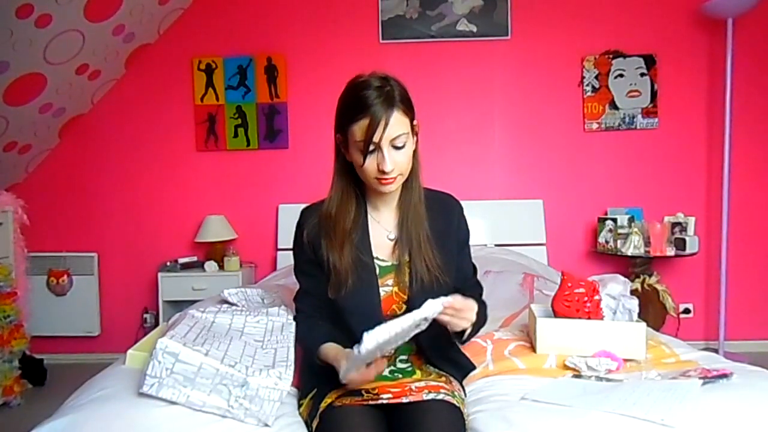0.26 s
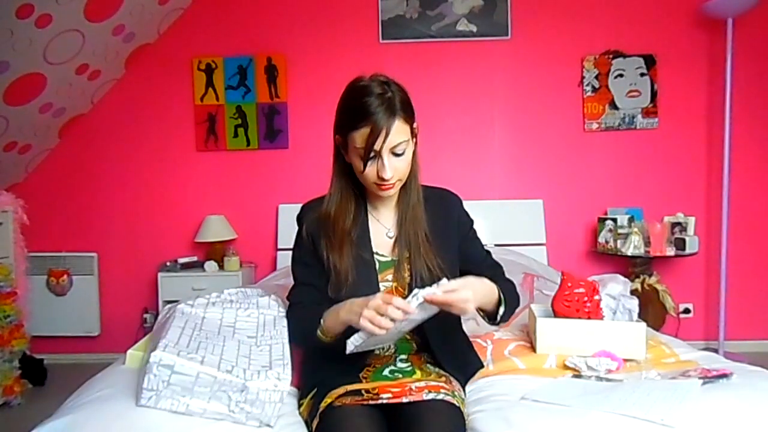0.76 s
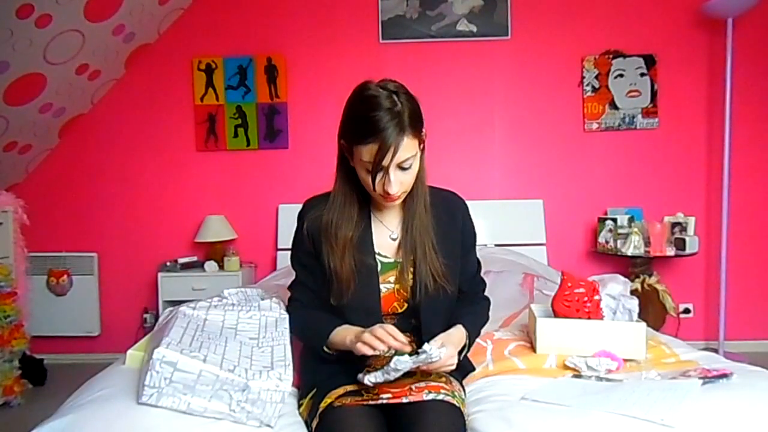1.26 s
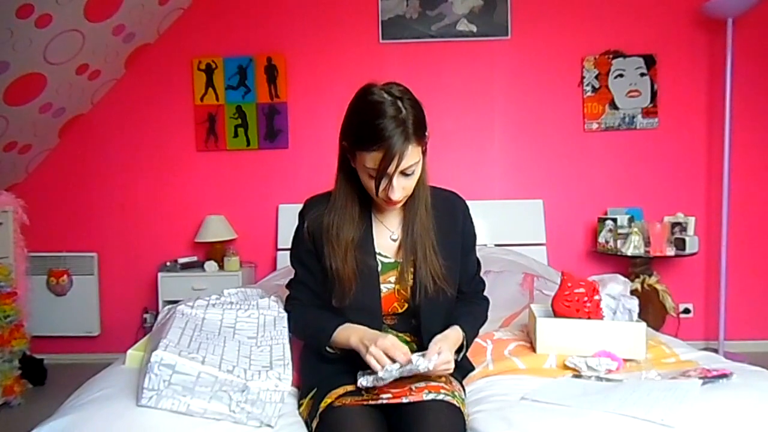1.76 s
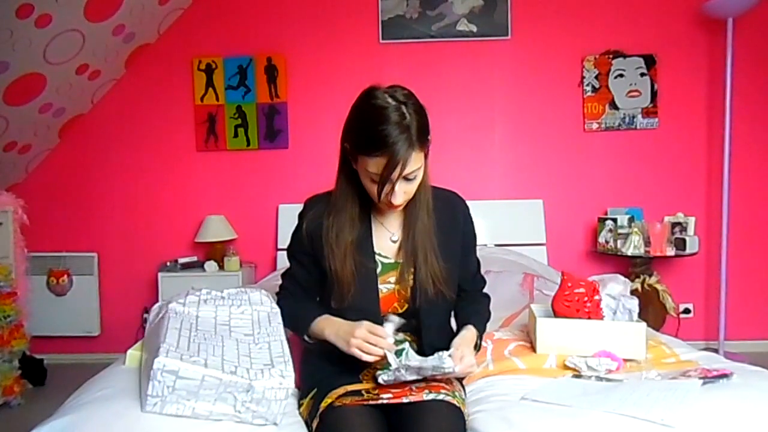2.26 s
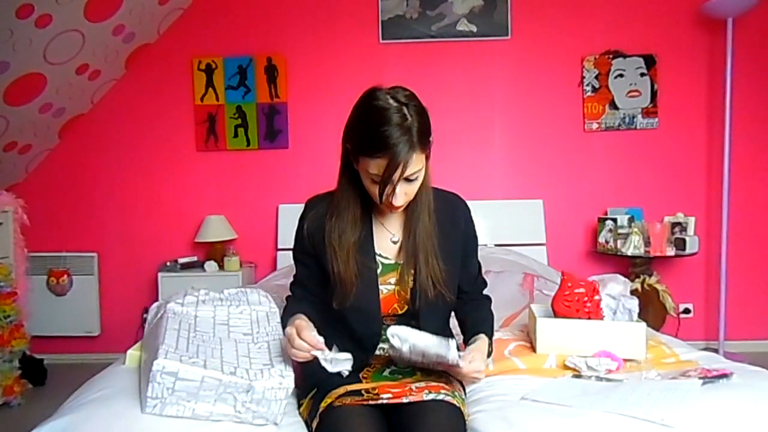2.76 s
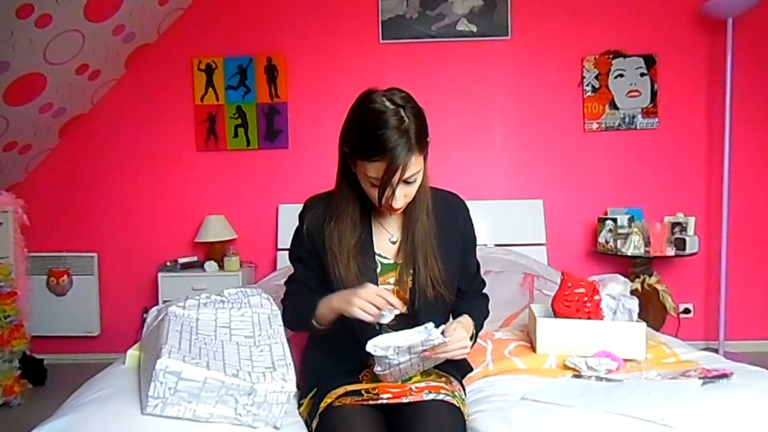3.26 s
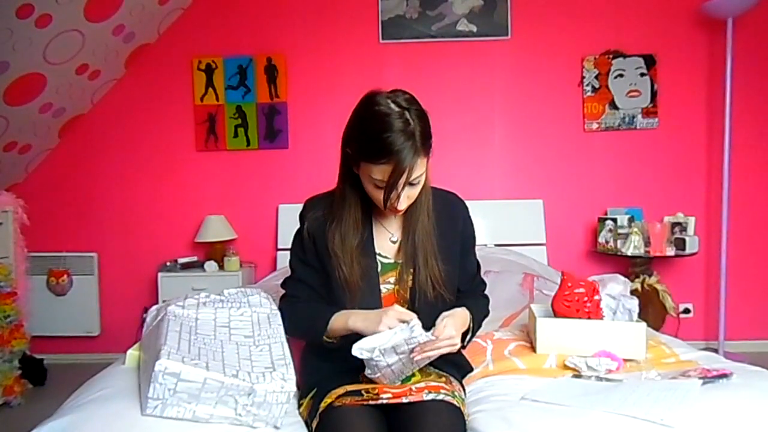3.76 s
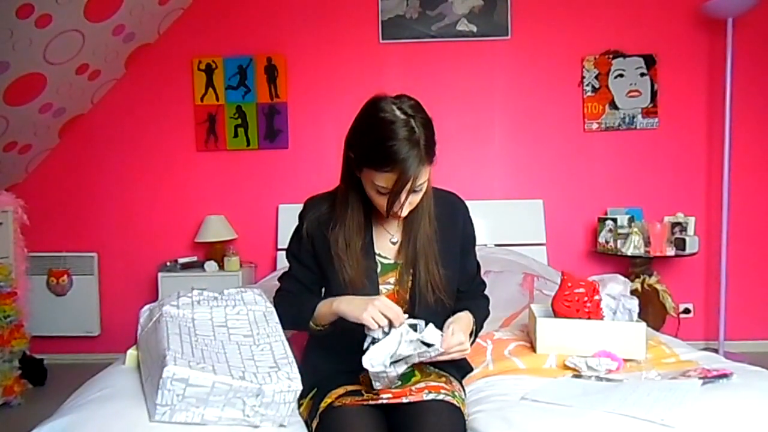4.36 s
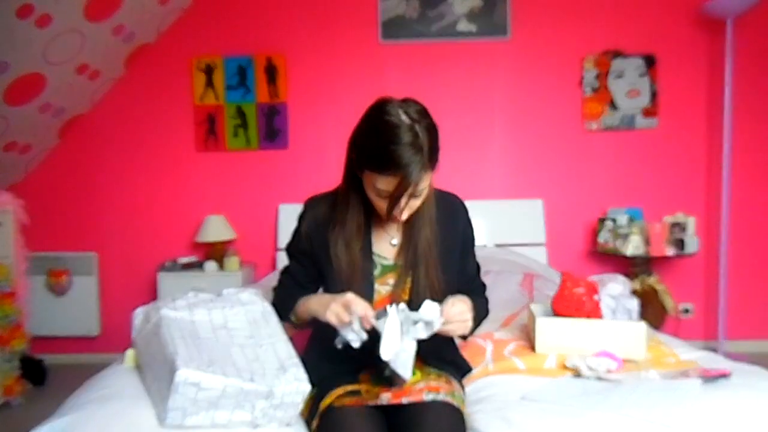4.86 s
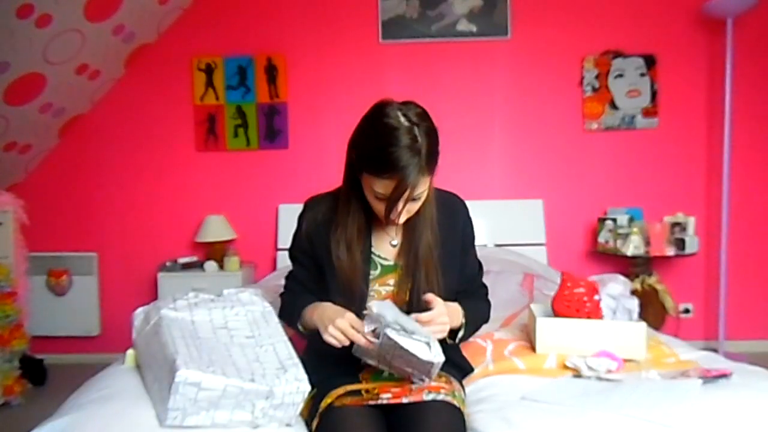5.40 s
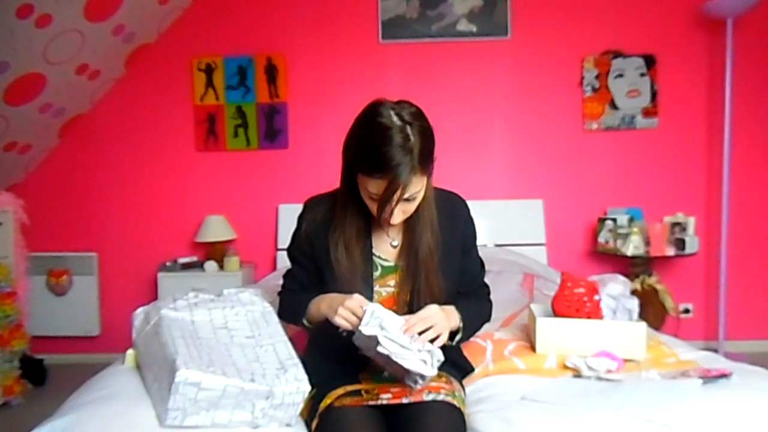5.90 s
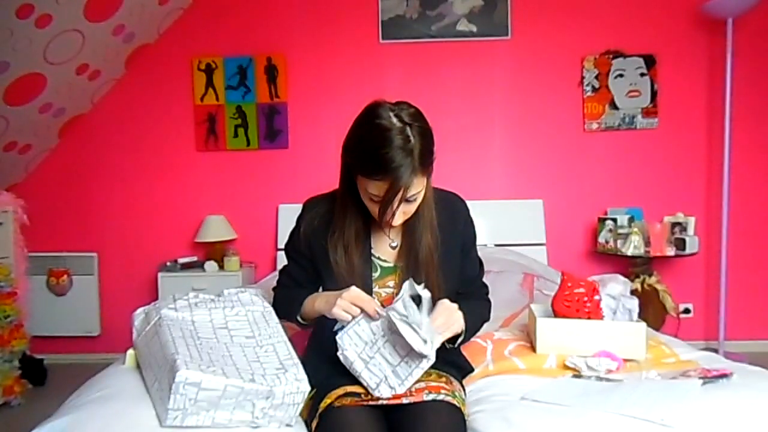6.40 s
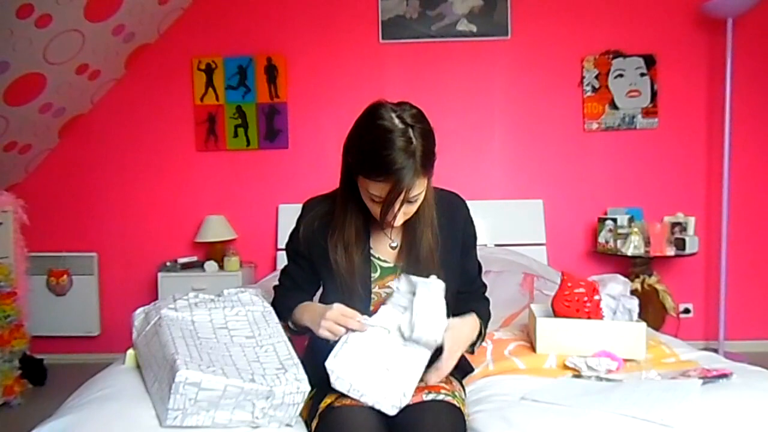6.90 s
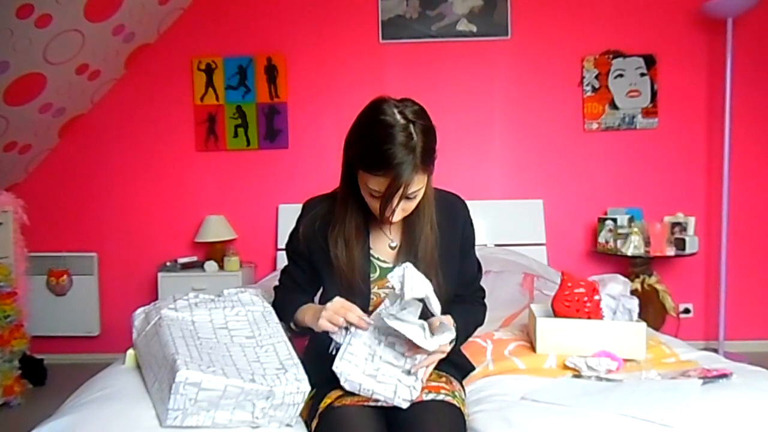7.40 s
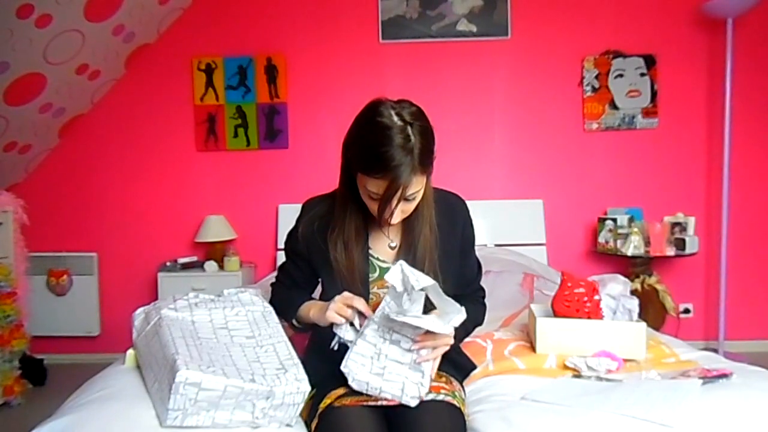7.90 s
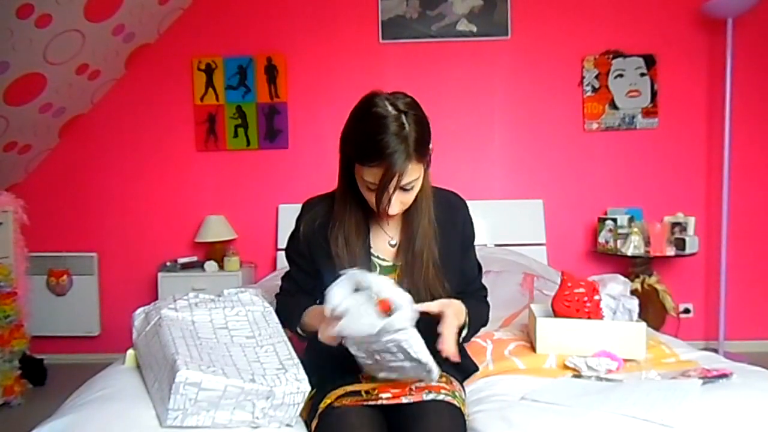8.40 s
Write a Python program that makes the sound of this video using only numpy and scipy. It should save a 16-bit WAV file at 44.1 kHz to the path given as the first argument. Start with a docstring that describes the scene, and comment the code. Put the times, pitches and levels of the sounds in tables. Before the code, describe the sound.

Thin wrapping paper is handled a couple of metres from the microphone in a small furnished bedroom, with a short room echo. It opens with a burst of crinkling and snaps in the first half second, then drops to light rustling. The crackle builds from about 1.7 seconds to a short tear with a very sharp crack at 2.2 seconds, the loudest moment. A second rip follows near 2.8 seconds. From 3 to 4 seconds there are only faint crinkles. From about 4.3 to 6.8 seconds the paper is pulled and crumpled in dense, uneven bursts, with strong snaps around 5.1, 6 and 6.4 seconds. Lighter crinkling continues until the end at about 8.6 seconds. Close to the microphone, a camera's focus motor ticks softly in brief regular runs, clearest near 2, 6 and 8 seconds. Faint steady hiss and a soft low rumble lie underneath.

```python
"""Gift wrap in a bedroom

Thin wrapping paper is handled, torn and crumpled a couple of metres from a camera's microphone, in a
small furnished bedroom. Creases buckle as a dense crackle and as single loud snaps; a near surface and
the walls echo them. Close to the microphone the focus motor ticks in short regular runs, over steady
hiss and the rumble of moved air and bedding."""
import sys
import numpy as np
from scipy import signal
from scipy.fft import rfft, irfft, next_fast_len
from scipy.io import wavfile

SR = 44100
rng = np.random.default_rng(int(sys.argv[2]) if len(sys.argv) > 2 else 0)


def persist_wave(psi):
    """Save psi, clipped to +-1, as 16-bit WAV."""
    counts = np.round(np.clip(psi, -1, 1) * 32767).astype(np.int16)
    wavfile.write(sys.argv[1], SR, np.atleast_2d(counts).T)


N = 381465


def from_db(db):
    return 10 ** (np.asarray(db) / 20)


def rms_one(x):
    return x / np.sqrt(np.mean(x ** 2) + 1e-20)


def at_hz(points, hz):
    """Read a curve of (Hz, value) points along a logarithmic frequency axis."""
    freqs, values = np.transpose(points)
    return np.interp(np.log(hz), np.log(freqs), values)


def band(x, low_hz, high_hz):
    return signal.sosfilt(signal.butter(2, [low_hz, high_hz], "band", fs=SR, output="sos"), x)


def drift(rate_hz):
    """A slow random wander with an RMS of 1."""
    pole = np.exp(-40 * np.pi * rate_hz / SR)   # one point every 20 samples
    slow = signal.lfilter([1], [1, -2 * pole, pole * pole], rng.standard_normal(N // 20 + 2002))[2000:]
    return np.interp(np.arange(N) / 20, np.arange(len(slow)), rms_one(slow))


def ring(clicks, hz, t60):
    """A unit click sets a sine of height 1 ringing; it falls 60 dB in t60 seconds."""
    r, w = from_db(-60 / (t60 * SR)), 2 * np.pi * hz / SR
    return signal.lfilter([0, np.sin(w)], [1, -2 * r * np.cos(w), r * r], clicks + 1e-18)


def hands(resting_db=-71):
    """Each pull swells, holds and fades; overlapping pulls add in power and mix their colours."""
    # Pulls, tears and squeezes. Each row: start of full strength and hold in seconds, crackle level
    # in dB, seconds to swell and to fade 20 dB (under 5 ms counts as 5 ms), boom of broad folds and
    # crispness of small creases in relative dB.
    pulls = [(0.0, 0.0085, -27.5, .05, 0.06, -5.5, 2), (.07, 0.0092, -23.5, 0.5, 0.12, -7.5, -14.5),
             (.1, 0.056, -35, -0.1, 0.12, 1, -2), (0.199, 0.033, -33.5, 0.03, 0.114, -9, 5),
             (.41, 0.011, -34.5, -0.03, 0.0263, 2, 0.5), (0.469, .06, -43.5, -0.3, .06, 2, -0.5),
             (.64, 0.21, -53, 0.1, 0.4, -1.5, -0.5), (.99, .01, -46, .12, 0.07, 1, 0.5),
             (1.33, .01, -48.5, 0.16, 0.16, 1, -7.5), (1.64, .14, -55, 0.34, 0, 6, 2),
             (1.85, .04, -44.5, 0.2, 0.3, -0.5, -2), (1.95, .05, -37.5, 0.1552, 0.2555, 0, 1.5),
             (2.191, 0.027, -16, 0.0365, 0.0255, -7.5, 3.5), (2.25, 0.078, -39, 0.18, 0.11, -10, -4.5),
             (2.38, .02, -56, 0.7, 0.07, 6, 7), (2.49, 0.028, -58.5, 0.5, 0.2, 3, -3),
             (2.6, 0.054, -57.5, .03, 0, 5, 4), (2.721, 0.1, -32, 0.0747, 0.034, -11.5, 0),
             (2.858, 0.0077, -25, 0.05, 0.0236, -1, 9), (2.9, .09, -56.5, .05, 0.19, 2, 8),
             (3.25, .15, -65.5, 0.8, .15, 2.5, 1.5), (3.93, 0.072, -53, 0.03, 0.05, 4, 10),
             (4.11, 0.044, -57.5, 0.1, -0.3, -1, 7), (4.26, .01, -58, 0.1, -5, 6, -4.5),
             (4.289, 0.011, -41, -0.02, 0.2, 2.5, 10), (4.34, 0.0093, -37, 0.05, 0.1, -3.5, 4),
             (4.499, .01, -31, 0.19, 0.17, -3, 5.5), (4.664, .01, -36, 0.01, .05, -5, 4),
             (4.7, .02, -21.5, 0.0448, 0.14, -5, -3.5), (4.839, 0.0093, -30.5, 0.0235, 0.09, -4, 2),
             (4.94, 0.018, -32, 0.07, 0.12, 4, 6.5), (5.111, 0.022, -24, 0.0227, 0.0533, 0.5, 3.5),
             (5.17, 0.0076, -23.5, 0.02, 0.04, -23, -0.5), (5.31, 0.14, -45.5, -0.33, .1, 4.5, 3.5),
             (5.45, .06, -36.5, 0.02, .09, 1, 1), (5.61, 0.054, -57, -0.5, .04, 7, 1.5),
             (5.76, 0.1, -44, -0.06, 0.8, 3.5, -4.5), (5.9, .01, -30, 0.0748, 0.2, 1, -6),
             (5.95, 0.012, -26, 0.08, 0.05, -1.5, -15), (6.07, 0.0084, -37, 0, 0.12, -2, 0),
             (6.35, 0.067, -36, 0.12, 0.03, 1.5, -4.5), (6.53, 0.0084, -29, 0.0954, 0.13, -8, 1),
             (6.6, 0.051, -31, 0.23, 0.08, -0.5, -1.5), (6.72, 0.013, -24, 0.06, 0.0573, -4, 1),
             (6.8, .14, -56, 4, .1, 2.5, 7), (7.03, .01, -43.5, .12, 0.19, 1.5, 1.5),
             (7.178, .005, -45, -0.2, -1, -1, -6), (7.231, .005, -45.5, -0.06, -0.47, 8.5, -14),
             (7.38, 0.071, -46.5, -0.08, -0.1, -3, 2), (7.59, 0.0091, -39.5, 0.3, 0.12, -0.5, -4),
             (7.75, 0.012, -38, 0.04, .06, 5.5, -7.5), (7.819, 0.015, -41, 0.09, 0.05, 6.5, 2),
             (7.93, 0.017, -41, 0.13, 0.06, 5, -3.5), (8.04, .01, -54, -0.5, .5, 2, 0),
             (8.36, .03, -42.5, 0.07, 0.05, 7, -9), (8.45, 0.044, -46, 0.4, 0.14, 1.5, -1)]
    start, held, db, swell, fade, boom_db, crisp_db = np.transpose(pulls)[:, :, None]
    t = np.arange(0, N + 64, 64) / SR
    before = np.maximum(start - t, 0) / np.maximum(swell, .005)
    after = np.maximum(t - start - held, 0) / np.maximum(fade, .005)
    power = from_db(np.maximum(db - 20 * (before + after), -150)) ** 2
    total = power.sum(axis=0) + from_db(resting_db) ** 2   # merely held, the sheet crackles faintly
    level = 10 * np.log10(total)
    boom = (power * boom_db).sum(axis=0) / total
    crisp = (power * crisp_db).sum(axis=0) / total
    return [np.interp(np.arange(N) / SR, t, curve) for curve in (level, boom, crisp)]


def crackle(level_db, boom_db, crisp_db, per_s, spread_db, ring_cycles):
    """Creases buckle at random, faster the harder the pull; each rings a few patches of the sheet."""
    # The paper's spectrum. Each row: frequency in Hz, relative density in dB.
    paper_colour = [(160, -7), (260, -13), (400, -4.5), (800, -3), (1200, -2), (1600, -12.5), (3000, -7.5),
                    (5500, -6), (8300, -6), (12000, -15.5), (16000, -12.5)]
    sizes = from_db(spread_db * np.minimum(rng.exponential(1, N), 3.5)) * rng.choice([-1, 1], N)
    rate = per_s * from_db(.25 * (level_db + 50) + 3.2 * drift(28))   # about per_s at a -50 dB pull
    clicks = sizes * (rng.random(N) < rate / SR) / np.sqrt(rate)
    out = 0
    for hz in np.geomspace(180, 15500, num=30):
        low_lift_db = at_hz([(1100, 1), (1700, 0.057)], hz) * boom_db
        high_lift_db = at_hz([(5000, 0.21), (7000, 0.89)], hz) * crisp_db
        hits = clicks * (rng.random(N) < .12)
        patch = rms_one(ring(hits, hz, ring_cycles / hz))
        wander_db = 2.85 * drift(3.66)   # the folds keep changing shape
        gain = from_db(level_db + low_lift_db + high_lift_db + at_hz(paper_colour, hz) + wander_db)
        out = out + gain * patch * np.sqrt(hz / 75000)   # higher patches cover wider bands
    return out


def snaps(size=2000):
    """A crease flips: a millisecond of crack with its own ring, then the fold's body and hollow boom."""
    # Single creases. Each row: start in seconds, crack peak in dB, ring pitch in Hz, ring peak in dB
    # relative to the crack, body peak in dB, boom peak in dB, boom pitch in Hz.
    creases = [(0.0428, -17, 4400, 0, -42, -50, 900), (0.0555, -13, 4970, -11, -35, -36, 403),
               (0.0789, -24, 5020, -8, -26, -24, 905), (0.156, -34, 4840, -8, -40, -36, 690),
               (0.182, -21, 4070, -2, -32, -30.5, 810), (0.3214, -43, 3010, 4, -34, -40.5, 740),
               (0.3575, -45.5, 3840, -4, -44, -38, 710), (0.3945, -32.5, 2980, -2, -26, -39, 1180),
               (0.4537, -25, 3200, -19, -24, -39, 750), (0.5055, -41, 3320, -12, -29.5, -36.5, 744),
               (0.9283, -31, 7800, -3.5, -35.5, -47, 1240), (1.0157, -46, 3060, -10, -32.5, -54, 1020),
               (1.2247, -44, 5300, 5, -64, -65, 406), (1.26, -44, 6100, 5, -50, -73, 476),
               (1.3003, -56, 3810, 0, -40.5, -44, 370), (1.529, -48, 3500, -1, -47, -49.5, 670),
               (1.5688, -45, 7870, -3, -65, -47, 1010), (1.6713, -20.5, 3330, -11, -34, -37.5, 454),
               (1.8417, -32.5, 4600, -6.5, -33.5, -37.5, 820), (1.8968, -34, 3770, 0, -31, -42, 656),
               (1.915, -29, 8600, -1, -57, -58, 848), (1.926, -20.5, 5400, -8, -48, -39, 598),
               (2.0365, -33, 7930, -5, -42, -35, 940), (2.1147, -24.5, 4890, -9, -38, -37, 714),
               (2.177, -19, 4600, -3, -22, -25, 830), (2.204, -0.5, 7350, -4, -38, -12.5, 800),
               (2.486, -52, 3330, -2.5, -62, -49, 1123), (2.5807, -33.5, 6050, -9, -40.5, -48, 880),
               (2.7049, -33, 4750, -7, -30, -46, 1000), (2.7608, -18.5, 4840, -8, -24, -31, 580),
               (2.792, -25, 3280, -5, -24, -27, 845), (2.8494, -14.5, 8400, -5, -35, -25, 1060),
               (2.8629, -12, 7150, -10, -44, -31, 816), (2.8688, -15, 8400, -11, -38, -38, 610),
               (3.1573, -39, 8600, -5, -55, -73, 382), (3.2048, -43, 3340, -8, -53, -58, 325),
               (3.26, -43, 7630, 0, -52, -49, 880), (3.368, -45.5, 3030, -6, -66, -49, 535),
               (3.4372, -51, 3320, -4, -62, -56, 824), (3.6516, -58, 4200, -7, -57, -58, 743),
               (3.893, -33.5, 8150, -6, -43, -44.5, 866), (3.9217, -43, 8870, -1, -49, -53, 1000),
               (3.954, -40, 3410, -4, -42, -43, 382), (4.1045, -33.5, 8400, -6, -42, -47.5, 666),
               (4.2787, -31, 8600, -2, -34, -39, 668), (4.4344, -27.5, 4540, -8, -26.5, -48, 985),
               (4.659, -23, 3440, -13, -26, -34, 980), (4.6825, -19, 3500, 2.5, -24, -29.5, 607),
               (4.8365, -17, 4900, -6, -29, -29.5, 567), (4.913, -27, 3570, -8, -23, -25.5, 470),
               (4.9377, -36, 3430, -10, -17.5, -24, 595), (5.0888, -18, 8300, -13, -30, -24, 341),
               (5.1059, -5, 4900, -10, -13.5, -21, 563), (5.1394, -17.5, 4030, 1.5, -32, -29, 634),
               (5.1646, -13, 3280, -5, -33, -38, 386), (5.3058, -26, 3080, -9, -34.5, -37, 368),
               (5.4459, -33, 5260, 4, -46, -32, 370), (5.456, -17, 3440, -2, -26, -42, 293),
               (5.4801, -20.5, 6700, 1, -46, -36, 385), (5.6306, -40, 4720, -10, -44, -45.5, 865),
               (5.6822, -52, 2980, -4, -46, -44, 806), (5.7448, -42, 3760, -6, -38, -45, 1260),
               (5.8004, -51, 3880, 3, -39, -33.5, 816), (5.8453, -30, 3280, -4, -34, -41, 896),
               (5.893, -40, 4000, -2, -29, -30, 400), (6.0216, -14.5, 5400, -13.5, -19, -23, 710),
               (6.2377, -43, 3280, -1, -40, -39, 754), (6.266, -36, 3060, -10.5, -35, -41, 676),
               (6.335, -33, 4870, -2, -32.5, -34, 850), (6.418, -12.5, 5100, -3, -18.5, -30, 1100),
               (6.502, -26.5, 3760, -6, -25, -28, 860), (6.5444, -22, 3840, 1, -37, -30, 826),
               (6.5901, -17.5, 5100, -2, -37, -31, 1050), (6.6881, -18.5, 9400, -1, -16.5, -31, 455),
               (6.7064, -25, 9700, -6, -30, -20, 810), (6.72, -15.5, 2970, -2.5, -35, -25.5, 540),
               (6.755, -24, 4200, -6, -21.5, -35, 570), (6.992, -42.5, 3830, 0, -41, -42, 1010),
               (7.014, -28, 9200, -4, -52.5, -46.5, 700), (7.023, -28, 4370, -4, -41, -46, 830),
               (7.161, -34.5, 3350, 3.5, -37, -47, 738), (7.226, -39, 4600, 9, -54, -47, 580),
               (7.3356, -49, 4850, -2, -51, -62, 926), (7.3787, -33.5, 4840, -0.5, -39, -41, 455),
               (7.3883, -37, 5230, -5, -46, -36.5, 470), (7.4129, -29, 5150, -16, -42, -46, 404),
               (7.438, -41, 4970, -7, -35, -42, 580), (7.45, -24, 5400, -2, -40, -37.5, 1050),
               (7.5004, -26, 5060, -3, -33.5, -52, 890), (7.5275, -36, 5330, 5, -33, -38, 1030),
               (7.5758, -27, 5770, 3, -32, -41.5, 840), (7.7477, -42, 3060, -4, -30.5, -33, 556),
               (7.811, -24.5, 3380, -14, -30.5, -36, 810), (7.8978, -33, 4300, -14, -54, -37, 800),
               (7.9245, -45, 4460, -7, -41, -36, 365), (7.9421, -42, 4760, -3, -40, -34, 312),
               (7.9518, -42, 3020, -3.5, -33, -18.5, 1210), (7.984, -29, 4360, -12, -50, -42, 1140),
               (8.116, -46, 7700, 3, -42, -43, 696), (8.1542, -48, 4060, -3, -37.5, -40, 756),
               (8.4968, -32, 5040, -5, -54, -52, 570)]
    out, t = np.zeros(N + size), np.arange(size) / SR
    noises = rng.standard_normal((len(creases), 4, size))
    noises[:, :2, 0] = 2.5   # crack and ring open on a sharp edge
    for (start, crack_db, ring_hz, ring_db, body_db, boom_db, boom_hz), noise in zip(creases, noises):
        crack = band(noise[0] * np.exp(-t / .0006), 4000, 14500)
        tone = band(noise[1] * np.exp(-t / .0007), .8 * ring_hz, 1.25 * ring_hz)
        body = band(noise[2] * np.exp(-t / 0.0024), 1265, 4260)
        push = noise[3] * t / .0005 * np.exp(-t / 0.00043)   # a broad fold gives way more slowly
        boom = band(ring(push, boom_hz, t60=9.3 / boom_hz), 0.51 * boom_hz, 3.5 * boom_hz)
        at = round(start * SR)
        for part, db in ((crack, crack_db), (tone, crack_db + ring_db), (body, body_db), (boom, boom_db)):
            out[at:at + size] += from_db(db) * part / np.abs(part).max()
    return out[:N]


def bedroom(direct, tail_count=8, tail_db=-4, build_s=.012, crossfade_s=.04):
    """Direct sound, three echoes, and a tail that dies band by band and changes as the hands move."""
    # The room's decay. Each row: frequency in Hz, seconds to fall 60 dB.
    decay = [(125, 0.44), (400, 0.37), (1200, 0.34), (4000, 0.29), (9000, 0.26), (16000, 0.19)]
    # Echoes off the back wall, then farther surfaces: delays in seconds and levels in dB.
    echo_s = [.0068, .0155, .0196]
    echo_db = [-3, -15, -10]
    t = np.arange(SR // 2) / SR
    edges_hz = 60 * 2 ** np.arange(0, 8.4, .5)
    white = rng.standard_normal((2, tail_count, len(t)))
    tails = sum(band(white[k % 2], low, high) * from_db(-60 * t / at_hz(decay, low * 2 ** .25))
                for k, (low, high) in enumerate(zip(edges_hz, edges_hz[1:])))
    tails *= 1 - np.exp(-(t / build_s) ** 2)
    tails = from_db(tail_db) * tails / np.sqrt(np.sum(tails ** 2) / tail_count)
    place = np.arange(N) / SR / crossfade_s % tail_count   # the sound feeds each tail in turn
    out = direct.copy()
    for k, tail in enumerate(tails):
        away = np.abs((place - k + tail_count / 2) % tail_count - tail_count / 2)
        share = np.maximum(1 - away, 0)
        out += signal.fftconvolve(direct * np.sqrt(share), tail)[:N]
    for delay, db in zip(echo_s, echo_db):
        lag = np.round((delay + .00015 * drift(3)) * SR).astype(int)   # the path shifts with the hands
        out += from_db(db) * direct[np.maximum(np.arange(N) - lag, 0)]
    return out


def air_rumble():
    """Moved air and bedding reach the microphone as a low rumble that swells and sinks."""
    # The rumble's course. Each row: time in seconds, level in dB.
    course = [(0.0, -55), (1.54, -77.5), (2.26, -55), (2.55, -70), (2.99, -55.5), (3.18, -78.5),
              (4.21, -79.5), (4.6, -58.5), (5.18, -57.5), (5.25, -61), (5.54, -54), (5.64, -64),
              (6.53, -55), (7.32, -66), (8.02, -57), (8.21, -73), (8.5, -59), (8.65, -76)]
    level_db = np.interp(np.arange(N) / SR, *np.transpose(course))
    return from_db(level_db) * rms_one(band(rng.standard_normal(N), 33, 83))


def hiss(level_db=-69):
    """Steady noise of room and microphone."""
    # The noise floor. Each row: frequency in Hz, relative density in dB.
    floor_colour = [(18, -32.5), (30, 9), (38, -14), (79, 1.5), (303, 0.5), (345, 2), (684, -8.5),
                    (2060, -15), (8520, -18), (16000, -13.5)]
    size = next_fast_len(N)
    hz = np.maximum(np.arange(size // 2 + 1) * SR / size, 1)
    spectrum = rfft(rng.standard_normal(size)) * from_db(at_hz(floor_colour, hz))
    return from_db(level_db) * rms_one(irfft(spectrum, size)[:N])


def focus_motor(step_s=.0337, spread_db=1.2, size=2000):
    """Each step rattles the gears for a few milliseconds and rings the housing beside the microphone."""
    # Motor runs. Each row: first and last step in seconds, their relative levels in dB,
    # housing boom in relative dB.
    runs = [(0.623, 0.858, -41.5, -47, -1.5), (2.0263, 2.06, -29, -29.5, -4.5),
            (2.3936, 2.4937, -48.5, -47, -8), (3.676, 3.676, -55, -54, -12), (3.7615, 3.8626, -51, -53, -4),
            (4.065, 4.065, -47.5, -44, -13.5), (4.198, 4.2317, -46, -47, -12),
            (6.101, 6.203, -33.5, -39, -4.5), (7.904, 8.0719, -35, -34, -6),
            (8.2038, 8.3417, -42.5, -39.5, -8)]
    # Housing modes. Each row: frequency in Hz, relative level in dB, seconds to fall 60 dB.
    housing = [(679, 3, 0.058), (1104, -3, 0.012), (1500, 0, 0.022), (1980, -1, 0.014), (3150, -0.5, 0.01),
               (4400, -2.5, .008), (7800, -2.5, 0.0049)]
    out, t = np.zeros(N + size), np.arange(size) / SR
    steps = np.concatenate([
        np.linspace((first, first_db, boom_db), (last, last_db, boom_db), round((last - first) / step_s) + 1)
        for first, last, first_db, last_db, boom_db in runs])
    steps[:, 1] += spread_db * rng.standard_normal(len(steps))
    gear_noise = rng.standard_normal((len(steps), len(housing), size)) * t * np.exp(-t / 0.0019)
    for (start, step_db, boom_db), rattles in zip(steps, gear_noise):
        at = round(start * SR)
        for rattle, (hz, mode_db, t60) in zip(rattles, housing):
            mode = ring(rattle, hz, t60)
            peak = from_db(step_db + mode_db + boom_db * (hz < 1300)) / 2
            out[at:at + size] += peak * mode / np.abs(mode).max()
    return out[:N]


def scene():
    """One microphone: the paper across the room, the motor close and dry, rumble and hiss beneath."""
    paper = crackle(*hands(), per_s=5500.0, spread_db=4.0, ring_cycles=11.5) + snaps()
    low_cut = signal.butter(2, 190, "high", fs=SR, output="sos")   # little of the paper comes through below about 190 Hz
    paper = signal.sosfilt(low_cut, paper)
    rumble = air_rumble()
    return (bedroom(paper) + focus_motor() + rumble + hiss())[None]


def record(dry, overload=.8, cutoff_hz=15750):
    """The microphone port colours a few bands; the input overloads near full scale; the top is cut."""
    # The port's lifts and dips. Each row: centre in Hz, width in Hz, gain in dB.
    port = [(835, 600, 3), (1532, 500, -2.5), (2073, 580, 4), (6680, 700, -4)]
    for hz, width_hz, db in port:
        centre = -2 * np.cos(2 * np.pi * hz / SR)
        width, gain = np.pi * width_hz / SR, from_db(db / 2)
        dry = signal.lfilter([1 + width * gain, centre, 1 - width * gain],
                             [1 + width / gain, centre, 1 - width / gain], dry)
    clipped = np.clip(dry, -overload, overload)
    return signal.sosfilt(signal.ellip(12, .3, 75, cutoff_hz, fs=SR, output="sos"), clipped)


dry = scene()
out = record(dry)
persist_wave(out)
```